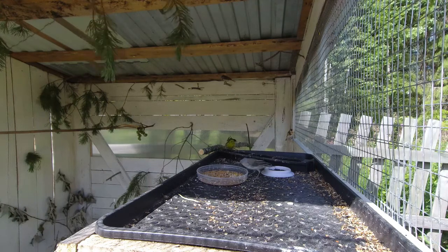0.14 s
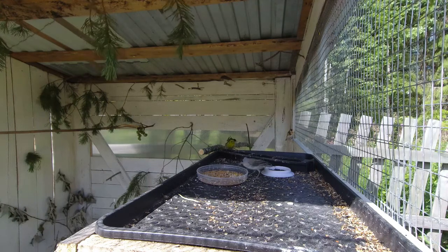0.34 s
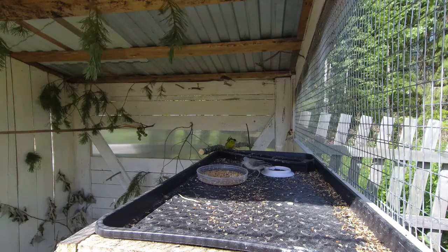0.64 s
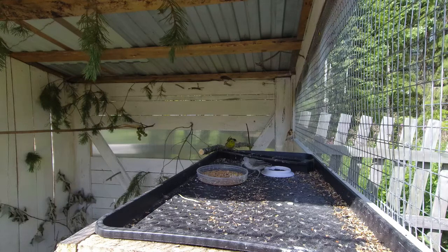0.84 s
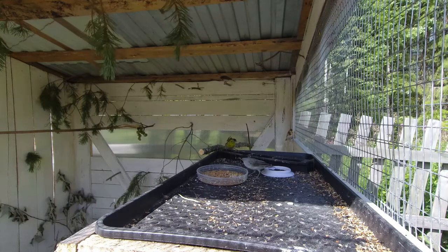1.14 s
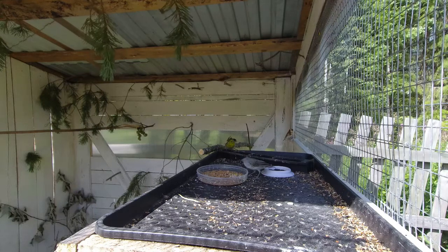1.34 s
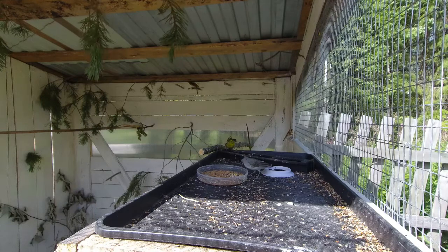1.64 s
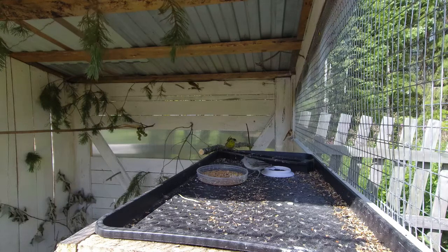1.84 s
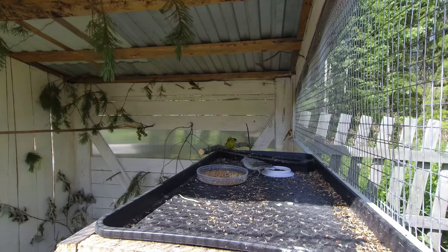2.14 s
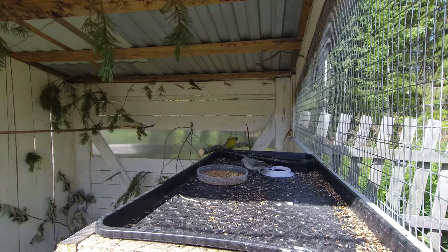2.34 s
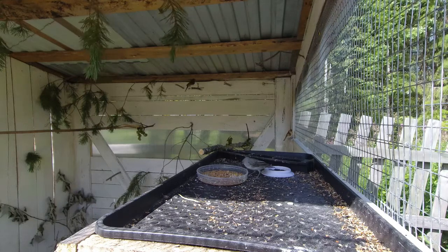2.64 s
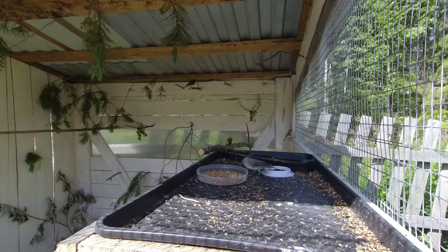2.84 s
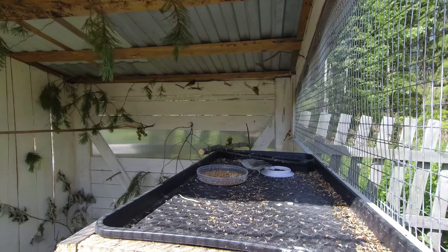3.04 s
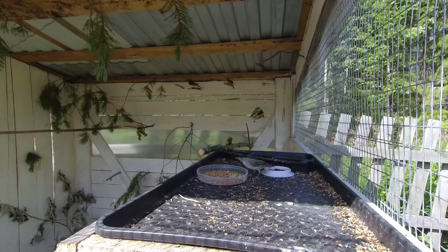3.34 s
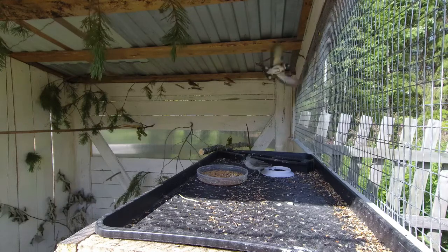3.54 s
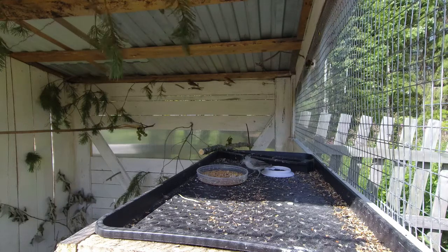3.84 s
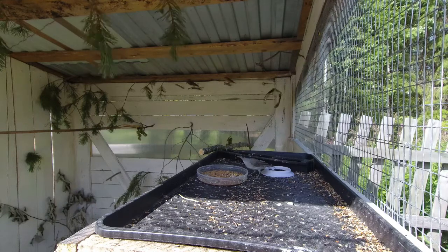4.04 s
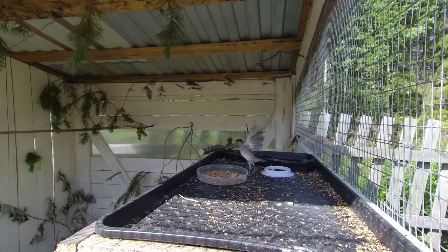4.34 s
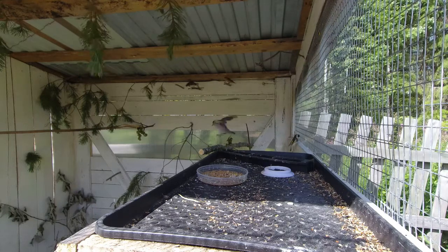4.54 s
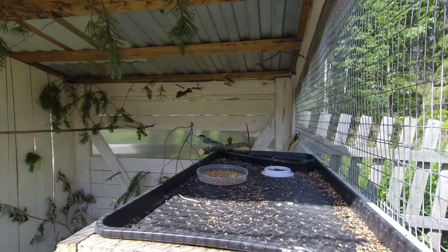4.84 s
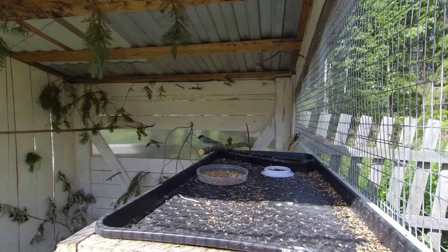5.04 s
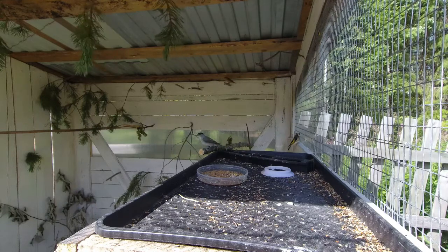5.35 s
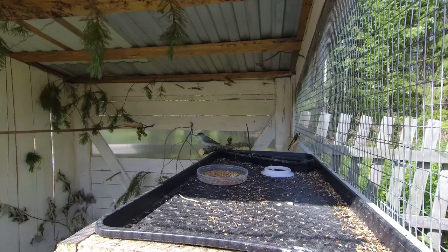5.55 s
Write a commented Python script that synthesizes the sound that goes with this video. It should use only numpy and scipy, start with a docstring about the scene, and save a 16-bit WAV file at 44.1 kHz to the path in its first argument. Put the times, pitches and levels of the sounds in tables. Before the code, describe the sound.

A small songbird gives short rising chirps in quick runs inside a wooden aviary, with wing flutters, perch knocks, seed ticks and faint hiss.

```python
"""Songbird in a wooden aviary

A small songbird gives short rising chirps, swept whistles smeared by close walls and a tin roof.
A bird flutters across in shaped noise; seed ticks are noise bursts, perch knocks and a thud are ringing tones.
Behind lie faint outdoor air with a low rumble (drifting noise) and the hiss and thin whine of the camera."""
import sys
import numpy as np
from scipy import signal
from scipy.fft import rfft, irfft
from scipy.io import wavfile

SR = 44100
rng = np.random.default_rng(int(sys.argv[2]) if len(sys.argv) > 2 else 0)


def digitize_waveform(pressure):
    """Quantize a signal to 16-bit integers and store it at the path in sys.argv[1].

    Rows of a 2-D input are taken as channels; values are limited to [-1, 1].
    """
    field = np.atleast_2d(pressure).T
    bounded = np.clip(field, -1, 1)
    quanta = np.round(bounded * 32767).astype(np.int16)
    wavfile.write(sys.argv[1], SR, quanta)


N = 250929
TIME = np.arange(N) / SR


def gain_of(db):
    """Decibels to amplitude."""
    return 10 ** (np.asarray(db) / 20)


def evened(x):
    """Scales to rms 1."""
    return x / np.sqrt(np.mean(x ** 2) + 1e-20)


def read(points, hz):
    """Reads a table on a log-frequency axis."""
    f, value = np.transpose(points)
    return np.interp(np.log(hz + 1), np.log(f + 1), value)


def gains(rows):
    """Each dB column of a curve table as a gain for every sample."""
    s, *columns = np.transpose(rows)
    return [gain_of(np.interp(TIME, s, column)) for column in columns]


def add(mix, s, sound):
    """Mixes a sound in at time s."""
    part = mix[max(round(s * SR), 0):][:len(sound)]
    part += sound[:len(part)]


def noise(colour):
    """Random noise of rms 1, its spectrum shaped by a table of levels."""
    hz = np.fft.rfftfreq(N, 1 / SR)
    spectrum = rfft(rng.standard_normal(N)) * gain_of(read(colour, hz))
    return evened(irfft(spectrum, N))


def wander(rate_hz):
    """Random movement of rms 1 around zero, fading out above the rate."""
    hz = np.fft.rfftfreq(N, 1 / SR)
    lowpass = np.exp(-(hz / rate_hz) ** 2) * (hz > 0)
    return evened(irfft(rfft(rng.standard_normal(N)) * lowpass, N))


def background(air_db=-47.5, hiss_db=-56, gust_db=0.5, flicker_db=1.0):
    """Outdoor air with its rumble, and the hiss of the microphone: two noises that drift and waver in level."""
    # spectrum of the air outside: (frequency [Hz], relative level [dB])
    air_colour = [(10, 2.5), (16, -1.5), (27, -13.5), (43, -11), (65, -21), (100, -22.5), (150, -27),
                  (230, -28), (480, -28), (750, -31), (1400, -34.5), (2000, -37.5), (3500, -106)]
    # spectrum of the microphone hiss: (frequency [Hz], relative level [dB])
    hiss_colour = [(500, -11.5), (1300, -26), (2000, -0.5), (3000, 0), (4100, 2), (5300, 0.5), (6600, -1),
                   (8200, -5), (10500, -8), (12800, -8.5), (14200, -5), (15700, -8.5)]
    # slow drift around the set levels: (time [s], air change [dB], hiss change [dB])
    drift = [(0, -0.5, -2.5), (1.2, -0.16, -2.5), (2.8, 0.6, -1.5), (3.8, 1.5, -2.5), (5.1, 1, -1),
             (5.69, 2, -1.6)]
    air_drift, hiss_drift = gains(drift)
    outdoors = air_drift * gain_of(air_db + gust_db * wander(22.0)) * noise(air_colour)
    hiss = hiss_drift * gain_of(hiss_db + flicker_db * wander(29.0)) * noise(hiss_colour)
    return outdoors + hiss


def whine():
    """Thin tones from the electronics, slightly wavering in pitch."""
    # whine: (centre frequency [Hz], rms level [dB], width = twice the rms pitch wander [Hz])
    tones = [(15000, -74, 1), (10385, -86, 8), (10448, -86, 8), (11695, -82, 70)]
    total = 0
    for hz, db, width in tones:
        phase = 2 * np.pi * np.cumsum(hz + width / 2 * wander(32)) / SR
        total = total + np.sqrt(2) * gain_of(db) * np.sin(phase)
    return total


def dips(x):
    """The level dips briefly a few times, by a frequency-dependent share that is greatest in the top treble."""
    # brief dips: (centre time [s], length [s], full depth [dB])
    dip_rows = [(.384, .012, 22), (3.632, .016, 20), (5.480, .028, 24), (5.552, .030, 28)]
    # how far each pitch follows the dip: (frequency [Hz], share of the full depth [1])
    share = [(200, 0.011), (1200, 0.12), (5000, 0.058), (8000, 1)]
    hz, t, z = signal.stft(x, SR, nperseg=256, noverlap=192)
    depth_db = sum(db * np.exp(-(2 * (t - s) / length) ** 4) for s, length, db in dip_rows)
    z = z * gain_of(-read(share, hz)[:, None] * depth_db)
    return signal.istft(z, SR, nperseg=256, noverlap=192)[1][:N]


def thud(time_s=2.607, level_db=-48, rise_s=0.00081):
    """A foot lands and sets the low modes of the wood ringing, each dying at its own rate."""
    # modes of the wood: (frequency [Hz], relative level [dB], time to fall 60 dB [s])
    wood = [(337, -8, 0.08), (428, 3, 0.049), (528, -6.5, 0.083), (850, 1.5, 0.027), (1340, 1, .025),
            (1740, -4, 0.028)]
    t = np.maximum(TIME - time_s, 0)
    ring = sum(gain_of(db - 60 * t / t60) * np.sin(2 * np.pi * hz * t) for hz, db, t60 in wood)
    return gain_of(level_db) * (1 - np.exp(-t / rise_s)) * ring


def knocks(t60_s=0.033, rise_s=0.0036, scatter=0.071):
    """A perch rings briefly with a loose, rattling pitch; scatter is the rms share by which it strays."""
    # soft knocks on the perches: (time [s], centre of the ring [Hz], level [dB])
    knock_rows = [(1.604, 1350, -50), (2.039, 1340, -44.5), (2.65, 1345, -38.5), (2.791, 1380, -48.5),
                  (3.409, 1434, -42.5), (4.649, 1320, -44), (4.672, 1520, -49), (4.818, 1390, -44)]
    out, t, rattle = np.zeros(N), np.arange(SR // 8) / SR, wander(480)
    for s, hz, db in knock_rows:
        ring_hz = hz * (1 + scatter * rattle[round(s * SR):][:len(t)])
        turns = np.cumsum(ring_hz) / SR
        swell = 1 - np.exp(-t / rise_s)
        add(out, s, gain_of(db - 60 * t / t60_s) * swell * np.sin(2 * np.pi * turns))
    return out


def ticks(crack_t60_s=0.00047, rattle_db=-19, rattle_t60_s=0.056):
    """Each tick is a bright crack of noise that dies at once, with a faint rattle of husks after it."""
    # a close bright snap that bounces twice, and fainter ticks of beak and claw: (time [s], level [dB])
    tick_rows = [(.705, -41), (1.153, -41), (1.735, -39), (1.755, -46), (1.9069, -32), (1.9079, -42),
                 (1.912, -46), (3.552, -50), (3.593, -48), (4.178, -48), (4.630, -43), (4.817, -45)]
    # spectrum of a tick: (frequency [Hz], relative level [dB])
    tick_colour = [(2000, -30), (5500, -17), (7500, -7), (9000, -5), (10300, 3), (12500, -1), (14000, -6),
                   (16000, -6)]
    level, t = np.zeros(N), np.arange(SR // 10) / SR
    for s, db in tick_rows:
        crack = gain_of(db - 60 * t / crack_t60_s)
        rattle = gain_of(db + rattle_db - 60 * t / rattle_t60_s)
        add(level, s, crack + rattle)
    return level * noise(tick_colour)


def flutter_levels(attack_s=0.038, t60_s=0.25):
    """The wings get going, hold, then the stirred air settles: one envelope a flutter for all three layers."""
    # flutters: (start [s], length [s], air push [dB], whoosh [dB], feather rustle [dB])
    flutters = [(1.595, 0.3, -53, -79, -84), (2.715, 0.224, -53.5, -74, -78),
                (3.282, 0.16, -44.5, -65, -61), (3.52, 0.095, -43, -62, -56),
                (3.645, 0.19, -45.5, -62.5, -77), (4.015, 0.21, -54.5, -63.5, -62),
                (5.293, 0.28, -53.5, -59.5, -81)]
    power = np.zeros((3, N))
    for s, length, *db in flutters:
        swell = np.clip((TIME - s) / attack_s, 0, 1)
        fade = gain_of(-60 * np.maximum(TIME - s - length, 0) / t60_s)
        power += (gain_of(db)[:, None] * swell * fade) ** 2
    return np.sqrt(power)


def wings(beat_hz=23, depth=0.22, grain_db=0.0):
    """A flutter pushes low air; its whoosh and feather rustle pulse with the uneven wingbeat."""
    # spectra of air push, whoosh and feather rustle: (frequency [Hz], relative level [dB])
    push_colour = [(8, -28), (25, 5), (50, -10), (100, -14.5), (200, -29), (400, -25), (1000, -66)]
    whoosh_colour = [(60, -8), (170, 12), (450, -3), (850, 0.5), (1300, -10), (2400, -6), (4500, -10),
                     (9000, -17)]
    rustle_colour = [(1500, -40), (4000, -6), (8000, 4), (12000, 5), (16000, 9.5)]
    push, whoosh, rustle = flutter_levels()
    beat_phase = 2 * np.pi * np.cumsum(beat_hz * (1 + 0.16 * wander(16.0))) / SR
    beat = evened(1 + depth * np.sin(beat_phase))
    grain = evened(gain_of(grain_db * wander(190)))  # at 0 dB the grain is smooth
    feathers = whoosh * noise(whoosh_colour) + rustle * noise(rustle_colour)
    return push * noise(push_colour) + beat * grain * feathers


def strokes():
    """A hard wing stroke is one short puff: a dull thump of air and the swish of the feathers."""
    # single strokes near the microphone: (peak time [s], half width at 1/e [s], thump [dB], swish [dB])
    stroke_rows = [(3.372, 0.0089, -61, -65), (3.637, 0.017, -46, -55), (3.686, 0.014, -61, -52.5),
                   (3.715, 0.017, -56, -52.5), (3.757, 0.019, -58, -59.5), (3.802, 0.02, -50, -60)]
    # spectra of the thump and the swish: (frequency [Hz], relative level [dB])
    thump_colour = [(40, 7.5), (100, 2), (180, 3.5), (300, -9), (520, -2), (800, -26), (2000, -47)]
    swish_colour = [(150, -2), (450, -4), (850, -1), (1250, 3.5), (1700, -3), (2300, -3.5), (4000, -12),
                    (9000, -12), (16000, -14)]
    out, thump, swish = np.zeros(N), noise(thump_colour), noise(swish_colour)
    for s, width, thump_db, swish_db in stroke_rows:
        puff = np.exp(-((TIME - s) / width) ** 2)
        out += puff * (gain_of(thump_db) * thump + gain_of(swish_db) * swish)
    return out


def chirps(third_db=-30, attack_s=0.0032, release_s=0.0076, shake_depth=0.13, low_reach=0.498,
           low_fade_db=-3.5, dulling_db=-11.5, strain_s=0.016):
    """A near-pure whistle starts softly, breaks into full voice and sweeps up, levelling off at the top.
    In forced notes the two sides of the syrinx part: the second climbs less far, and both shake and rasp."""
    # chirps: (time [s], length [s], start [Hz], top [Hz], bend of the sweep [1 = straight], soft lead-in [s],
    # lead-in level [dB], level [dB], change over the note [dB], then levels relative to the whistle:
    # octave [dB], rasp [dB], lower second voice [dB])
    chirp_rows = [ (1.336, 0.023, 2550, 3050, 2, 0.0093, -14, -41, 1.5, -17, -28, -40),
                  (1.459, 0.026, 2850, 4456, 1.94, 0.00089, -2, -40, -4.5, -26, -21, -16),
                  (1.587, 0.02, 3950, 4180, 2.0, 0.001, -14, -57, -4, -30, -28, -40),
                  (2.941, 0.019, 2500, 2970, 1.8, 0.0095, -14, -37, 2, -32, -38, -40),
                  (3.063, 0.033, 2700, 4150, 1.42, 0.004, -13, -37, -10.5, -21, -13, 1.5),
                  (3.1644, 0.016, 2540, 3080, 1.6, 0.0056, -15, -34, 0, -30, -27, -40),
                  (3.270, 0.037, 3030, 4046, 2.1, 0.011, -9, -36, -7, -18, -10.5, 0),
                  (3.3705, 0.021, 2480, 2975, 2.4, 0.01, -12, -35, -3.5, -13.5, -29, -40),
                  (3.4744, 0.026, 2840, 4220, 1.22, 0.009, -6, -33.5, 0, -24, -25, -22),
                  (3.598, 0.032, 2226, 3384, 1.8, 0.0055, -12, -35.5, -3.5, -18.5, -28, -14),
                  (4.0957, 0.021, 2330, 2920, 2.6, 0.0027, -12, -41, -6, -21, -27, -30),
                  (4.2462, 0.032, 2670, 3735, 2.2, 0.0063, -16, -34, -7, -30, -22, -19)]
    out, tremor, low_tremor, blur = np.zeros(N), wander(610), wander(530), wander(600)
    for (s, length, start_hz, top_hz, bend, lead, lead_db, db,
         sag_db, octave_db, rasp_db, low_db) in chirp_rows:
        t = np.arange(0, length, 1 / SR)
        u, here = t / length, round(s * SR) + np.arange(len(t))

        # a forced syrinx vibrates unevenly, in pitch and in strength
        strain = np.clip(t / strain_s, 0, 1)  # each note starts clean and roughens as it climbs
        roughness = gain_of(rasp_db)
        shake = shake_depth * roughness * strain
        buzz = evened(1 + 2 * roughness * strain * blur[here])

        climb = (top_hz - start_hz) * (1 - (1 - u) ** bend)
        pitch = (start_hz + climb) * (1 + shake * tremor[here])
        low_pitch = (start_hz + low_reach * climb) * (1 + shake * low_tremor[here])
        phase = 2 * np.pi * np.cumsum(pitch) / SR
        low_phase = 2 * np.pi * np.cumsum(low_pitch) / SR
        whistle, second, third, fourth = np.sin(np.outer([1, 2, 3, 4], phase))
        low_voice = strain * gain_of(low_db + low_fade_db * u) * np.sin(low_phase)

        edges = np.sin(np.pi / 2 * np.clip(np.minimum(t / attack_s, (length - t) / release_s), 0, 1))
        lead_in_db = lead_db * np.clip(1 - (t - lead) / attack_s, 0, 1)
        effort = edges * gain_of(lead_in_db + sag_db * u)

        overtones = gain_of(octave_db) * second + gain_of(third_db) * third
        rasp = roughness * blur[here] * (0.33 * second + 0.65 * third + 0.33 * fourth)
        dulling = gain_of(dulling_db * u ** 3)  # overtones die first
        bright = dulling * (effort * rasp + np.sqrt(effort) * edges * overtones)
        add(out, s, gain_of(db) * (effort * buzz * (whistle + low_voice) + bright))
    return out


def aviary(x, t60_s=0.18, tail_db=-18.0, build_s=0.0087):
    """A few close echoes, then a short tail of noise that escapes through the wire mesh."""
    # echoes off tray, walls and roof: (delay [s], gain [1], a minus sign flips the wave)
    echoes = [(.0028, -0.14), (.00464, -0.3), (.00713, 0.4), (0.0116, 0.21), (0.015, 0.095), (0.0175, 0.16),
              (.0242, 0.073), (0.0313, -0.076)]
    t = np.arange(SR // 2) / SR
    build_up = 1 - np.exp(-(t / build_s) ** 2)
    response = rng.standard_normal(len(t)) * gain_of(-60 * t / t60_s) * build_up
    response *= gain_of(tail_db) / np.linalg.norm(response)
    response[0] += 1  # the direct sound
    for delay, gain in echoes:
        response[round(delay * SR)] += gain
    return signal.fftconvolve(x, response)[:N]


def scene():
    """Chirps, knocks and thud in the aviary; dry ticks close by, wings and background; alike in both ears."""
    behind = dips(wings() + strokes() + background()) + whine()
    mono = behind + ticks() + aviary(chirps() + knocks() + thud())
    return np.array([mono, mono])


def record(dry, edge_hz=15850):
    """The band limit of the camera: a steep low-pass filter."""
    lowpass = signal.firwin(511, edge_hz, window=("kaiser", 9), fs=SR)
    return signal.oaconvolve(dry, lowpass[None], "same")


dry = scene()
out = record(dry)
digitize_waveform(out)
```